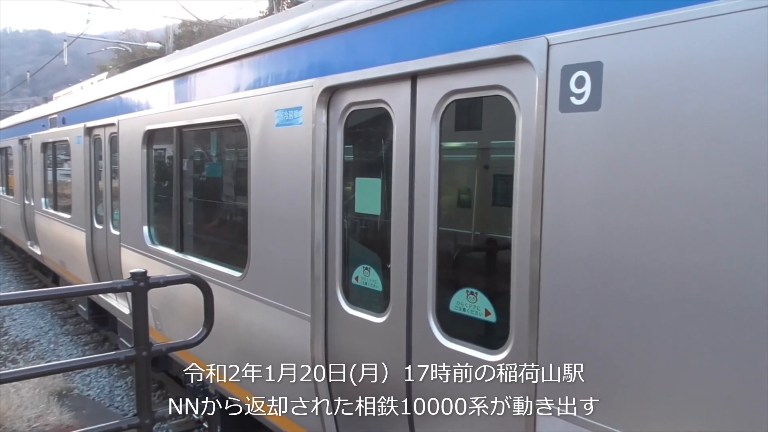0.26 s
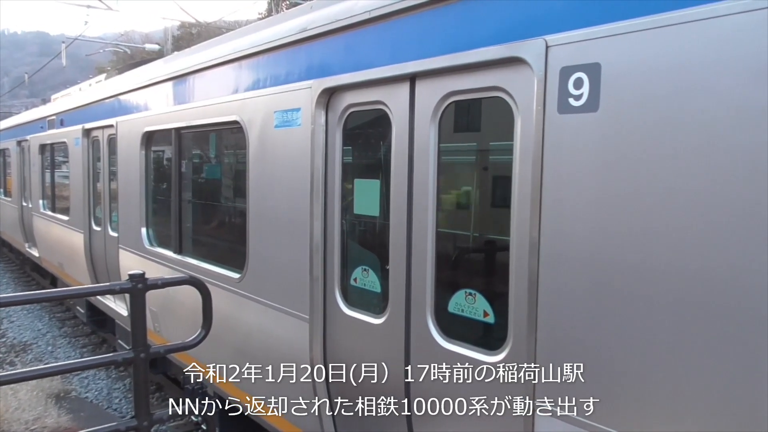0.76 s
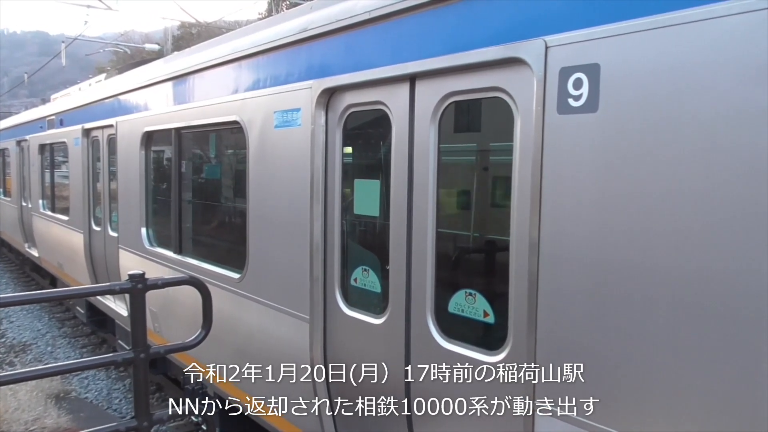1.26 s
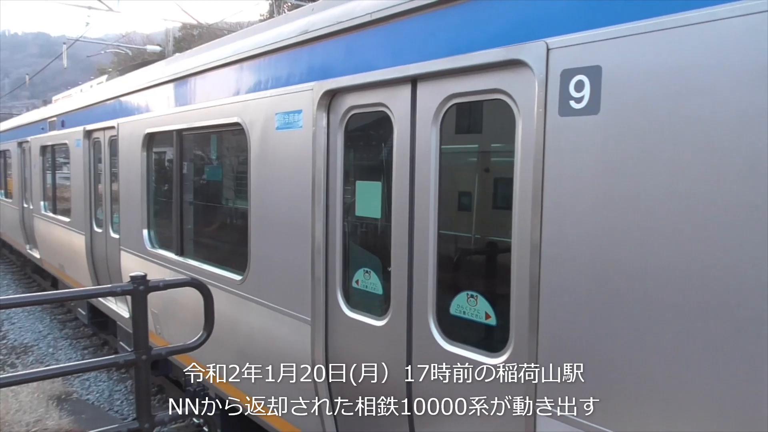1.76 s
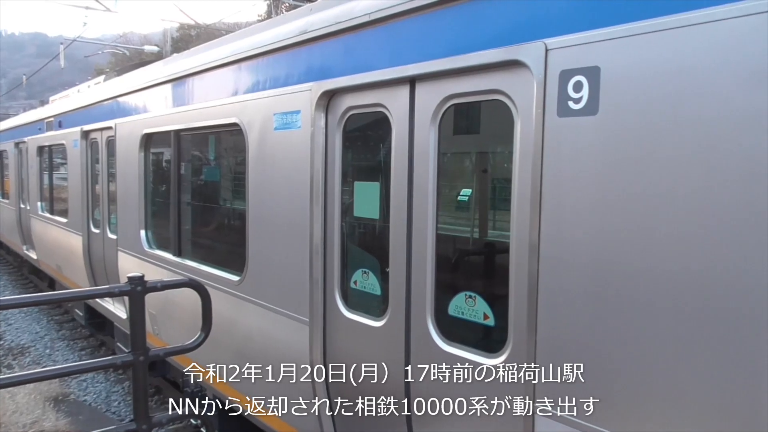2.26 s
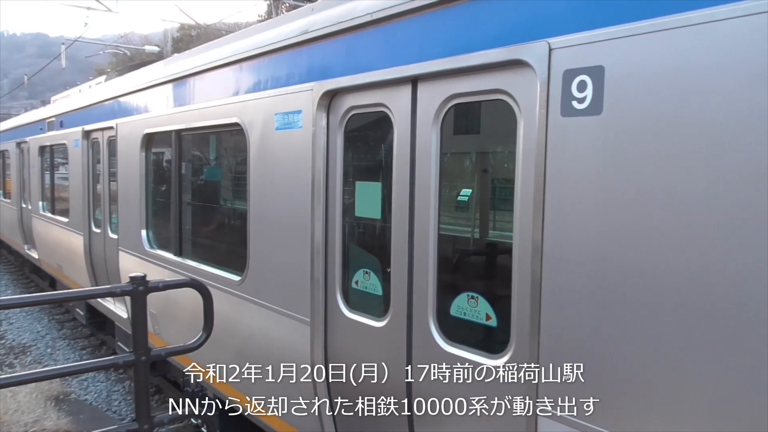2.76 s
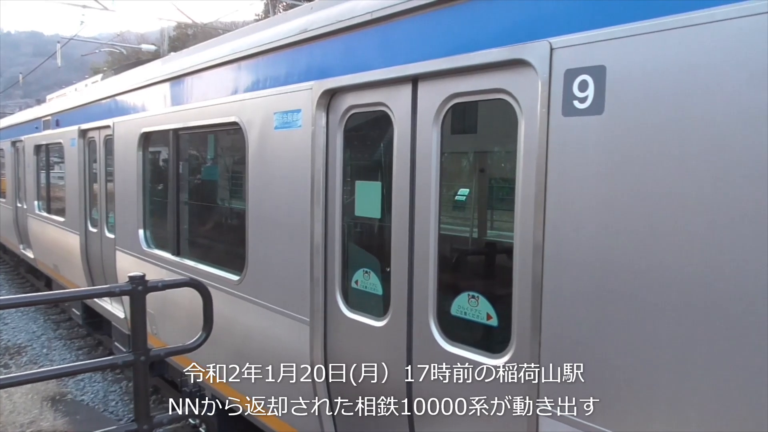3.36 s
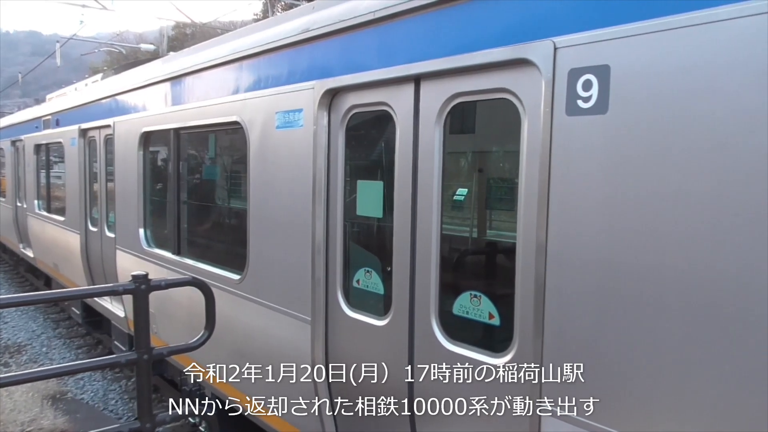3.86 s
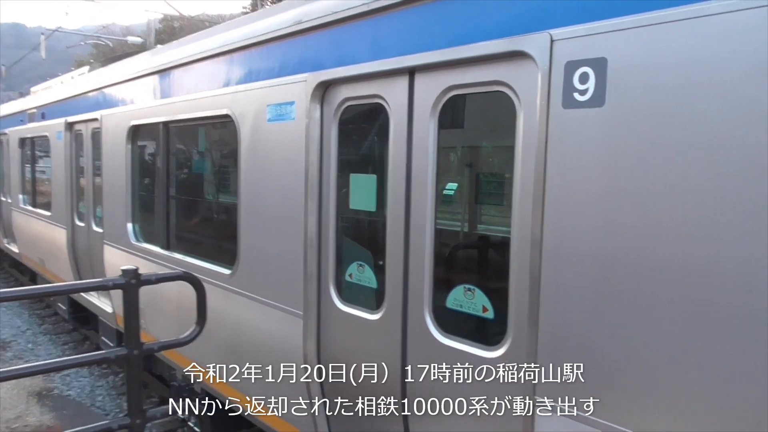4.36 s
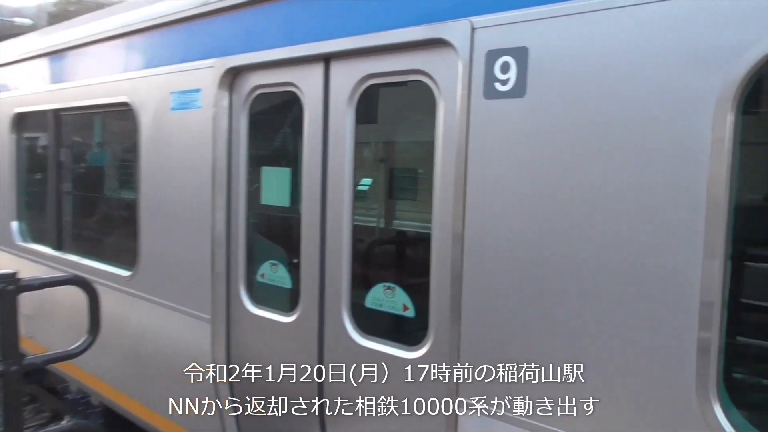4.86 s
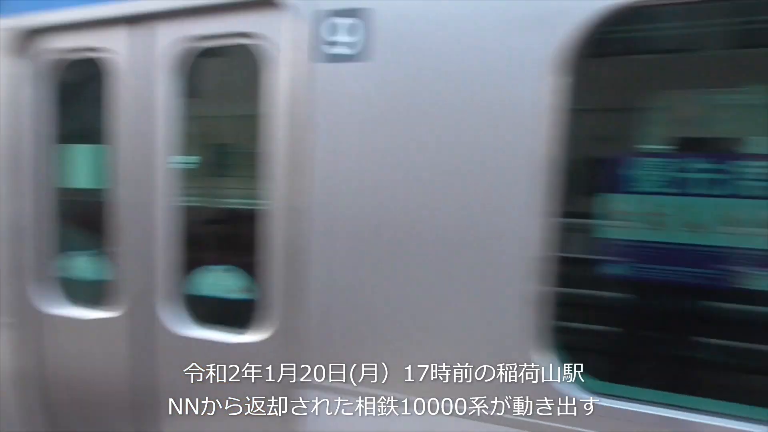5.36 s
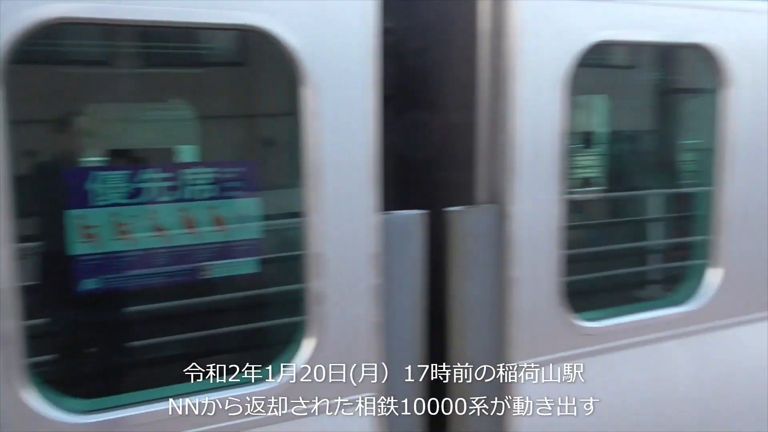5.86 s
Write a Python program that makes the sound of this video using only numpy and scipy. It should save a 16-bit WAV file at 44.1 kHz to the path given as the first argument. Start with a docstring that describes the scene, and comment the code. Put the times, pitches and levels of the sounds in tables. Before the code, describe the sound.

Already under way, a train beats over rail joints very close to a small stereo microphone pair in open air. Loud, bouncing clunks with short metal ring and loose rattle come about five a second, in clusters, with muffled thuds between. A deep rumble, hollow low humming of wheels and thin hiss ebb away. Later thuds are sparse and dull, with one brief steel grind and light flange scuffs.

```python
"""A low rumble and roar with a fine hiss: an electric train rolls out past the end of a platform,
an arm's length from a pair of close microphone ports.
Paired thumps follow: each two-axle bogie meets the same row of rail joints, softer and duller from further
down the line; the nearest joint is loose and rattles. Blows are decaying tones, rail modes and noise bursts.
Between them shaped noise makes the wheels rumble, sing and scuff; the hiss moves off with the train."""
import sys
import numpy as np
from scipy import signal
from scipy.fft import rfft, irfft, next_fast_len
from scipy.io import wavfile
from scipy.ndimage import uniform_filter1d

SR = 44100
rng = np.random.default_rng(int(sys.argv[2]) if len(sys.argv) > 2 else 0)


def int16_out(signal):
    """Quantize to a 16-bit WAV file."""
    q = np.round(np.clip(np.atleast_2d(signal).T, -1, 1) * 32767)
    wavfile.write(sys.argv[1], SR, q.astype(np.int16))


N = 269010
TIME = np.arange(N) / SR

# Levels over time are relative, before each layer's own trim.
# rolling, fading as the train leaves: time_s, near_wheel_rumble_db, rail_roar_db
ROLLING_LEVELS = [(0.0, -26.5, -37.5), (0.56, -26.5, -40), (0.95, -27.5, -36.5), (1.29, -29, -42),
                  (1.6, -28.5, -43), (1.95, -27, -41.5), (2.26, -28, -37), (2.65, -32, -42.5),
                  (2.95, -33.5, -46), (3.38, -32.5, -43.5), (3.87, -37.5, -47), (4.4, -38.5, -45),
                  (4.6, -37.5, -43), (4.85, -37, -45), (5.18, -40, -46), (5.83, -38, -44),
                  (6.1, -42, -45.5)]
# ground shuddering under the whole train: time_s, level_db
GROUND_LEVELS = [(0, -39), (1.2, -53), (1.7, -53), (2.3, -51), (3.2, -50), (3.8, -54), (4.7, -45),
                 (5.2, -57), (6.1, -56)]
# friction of the running gear: time_s, rim_ring_db, hiss_db
FRICTION_LEVELS = [(0.0, -45, -48), (0.3, -40.5, -48), (0.66, -50, -50.5), (0.97, -46, -50),
                   (1.65, -55, -53.5), (1.95, -60, -51), (2.26, -51, -50), (2.41, -51, -52),
                   (2.9, -53.5, -54), (3.48, -50, -55.5), (3.72, -54, -56), (3.97, -65, -55),
                   (4.15, -54, -54.5), (4.37, -52, -58.5), (4.7, -55, -57.5), (4.85, -58, -59.5),
                   (4.98, -57, -64.5), (5.3, -70, -65.5), (6.1, -58, -64)]
# low song of the wheels, fading as the train leaves: time_s, level_db
SONG_LEVELS = [(0.0, -33), (1.14, -27.5), (1.56, -39.5), (2.19, -31.5), (2.7, -42.5), (3.25, -37.5),
               (3.8, -43), (4.4, -44.5), (4.59, -37.5), (5.08, -56), (5.69, -55), (6.1, -60)]

# Noise colours, each scaled to unit power afterwards: frequency_hz, relative_density_db (per Hz)
RUMBLE_COLOUR = [(25, -37), (54, -18), (100, -6.5), (145, -4.5), (216, 0.5), (300, 0.5), (370, -2.5),
                 (448, -8.5), (532, -9), (620, -18), (800, -42), (1320, -70)]
GROUND_COLOUR = [(15, -20), (30, -18), (48, -9), (62, 2), (90, -5)]
ROAR_COLOUR = [(150, -9), (260, -8.5), (380, -2), (460, -4.5), (567, -1), (787, -5.5), (1010, -9),
               (1400, -17), (1850, -27), (3140, -34.5), (4050, -38), (5000, -38), (6500, -62),
               (11000, -120)]
HISS_COLOUR = [(1060, -35), (1800, -12), (2150, -2.5), (2600, -4.5), (2930, -9.5), (3120, -4.5),
               (3660, -3.5), (6280, -4.5), (11100, -2), (13000, -5), (14200, -11.5), (15400, -10)]
THUD_COLOUR = [(40, -29), (70, -24), (115, -15.5), (170, -3), (226, -2), (295, 1.5), (393, -5), (441, -9),
               (499, -11), (560, -12.5), (730, -27), (1230, -120)]
CLANK_COLOUR = [(260, -46), (450, -5.5), (497, 2), (563, -14.5), (679, -2), (765, -2), (994, -18.5),
                (1110, -15), (2000, -43.5), (2600, -42), (4400, -120)]
RATTLE_COLOUR = [(820, -50), (1400, -1), (1920, -9.5), (2150, -3), (2620, -12), (2860, -7.5), (3100, -8.5),
                 (6140, -12), (7790, -9.5), (9690, -11.5), (12400, -16.5), (15000, -35)]
GRIND_COLOUR = [(560, -4), (760, 3), (1000, -12), (1300, -15), (1500, -25)]

# wheel rim resonances: centre_hz, width_hz, relative_level_db
RIM_RESONANCES = [(2170, 79, -13), (2890, 100, -12), (3750, 200, -18), (4040, 830, -7.5)]
# wheel flanges scuffing the rail: middle_s, half_length_s, centre_hz, width_hz, level_db
FLANGE_SCUFFS = [(0.149, 0.047, 2000, 2400, -44), (0.179, 0.018, 1990, 2980, -36),
                 (2.451, 0.07, 2880, 130, -56), (2.709, 0.036, 2900, 110, -52.5),
                 (2.76, 0.071, 2194, 600, -58), (3.1, 0.37, 3880, 799.5, -64),
                 (3.459, 0.26, 2318, 220, -60), (4.07, 0.2, 4470, 2400, -55.5), (4.09, 0.2, 3500, 130, -64),
                 (4.705, 0.038, 2200, 1391, -54), (4.773, 0.24, 3599, 2000, -58),
                 (5.473, 0.015, 595.5, 200, -31)]
# axles crossing rail joints, the two of a bogie about 0.2 s apart; hard and high at the nearest joint,
# soft and low further off: strike_s, thump_db, pitch_hz, clank_db, first_hop_s, first_rebound_thump_db,
# rebound_pitch_hz, second_rebound_thump_db, clank_change_per_rebound_db
JOINT_CROSSINGS = [ (0.199, -2.5, 289.4, -18, 0.042, -9, 278.5, -18, -6.5),
                   (0.4, 0.5, 302.8, -18.5, 0.023, -10, 296, -19, -10),
                   (0.602, -11, 190, -31.5, 0.015, -10, 270.1, -17, 2),
                   (0.819, -2.5, 303, -18, 0.035, -2.5, 285, -20, -5.5),
                   (1.022, -5, 319, -17.5, 0.035, -5.5, 285, -8, -5),
                   (1.226, -15, 200, -33, 0.042, -13, 245, -21, -1),
                   (1.418, -13, 206, -35.5, 0.021, -13, 267, -29, 1.5),
                   (1.68, -13.5, 160, -29.5, 0.033, -15, 257, -18.5, -4),
                   (1.878, -12.5, 155.3, -33, 0.034, -16, 260.4, -16, -1.5),
                   (2.117, -3, 300.3, -18, 0.036, -4, 291.6, -15.5, -5.5),
                   (2.319, -2, 312, -17.5, 0.039, -8.5, 319, -9, -6),
                   (2.52, -9, 214.4, -39.5, 0.041, -14, 295.3, -15, 2.5),
                   (2.723, -12.5, 215, -32, 0.049, -12, 239.9, -28.5, -1),
                   (2.94, -24, 233.8, -34, 0.035, -28, 269, -22, -4),
                   (3.143, -11.5, 210, -31, 0.046, -13.5, 239.1, -24, -1),
                   (3.343, -11, 175, -33, 0.035, -13, 250.5, -14, -1.5),
                   (3.549, -22, 266, -37.5, 0.032, -28, 274, -29, -9.5),
                   (3.965, -24, 267, -40, 0.028, -23.5, 279.4, -33, -2),
                   (4.155, -20, 241, -41, 0.026, -20, 305.4, -33, -2.5),
                   (4.436, -10, 219.7, -37, 0.048, -16, 300.6, -16, 2),
                   (4.635, -7, 215, -35.5, 0.057, -14.5, 240, -15, -0.5),
                   (4.868, -31, 239, -41, 0.039, -31, 273, -31, -3),
                   (5.27, -26, 255, -38, 0.034, -28.5, 272, -39, 0),
                   (5.459, -19.5, 231, -37.5, 0.052, -25.5, 321, -30.5, -0.5),
                   (5.665, -24, 220, -37, 0.028, -25, 281, -35.5, -7),
                   (5.896, -24, 275, -35, 0.044, -27, 269.3, -35, -8),
                   (6.08, -17.5, 234, -41, 0.036, -24, 270, -33, -8)]
# rail and wheel modes woken by a hard blow: frequency_hz, relative_level_db, t60_s
BLOW_MODES = [(133, -19.5, 0.18), (194.4, -16, 0.26), (299.2, -14, 0.28), (384, -15, 0.33),
              (496.3, -21.5, 0.264), (663.5, -19.5, 0.24), (768, -24, 0.13), (884, -22, 0.11),
              (1075, -28, 0.2), (1233, -28, 0.1), (2160, -39, 0.2)]

# the microphone pair: frequency_hz, likeness (0 to 1)
PORT_LIKENESS = [(30, 0.95), (70, 0.79), (300, 0.96), (600, 0.87), (1200, 0.42), (2400, 0.31), (4500, 0.21),
                 (7000, .35), (9000, 0.53), (12000, 0.098), (15000, 0.13)]
# the microphone pair: frequency_hz, left_minus_right_db
PORT_TILT = [(35, 3), (80, 1.5), (170, 0), (330, -1), (600, -3.5), (1200, -2.5), (2800, -3), (6000, -1.1),
             (10000, 0), (15000, -5.5)]
# the microphone pair: frequency_hz, left_lead_rad (negative where the right leads)
PORT_LEAD = [(40, 0), (75, 1.06), (105, 0.5), (160, -0.55), (250, -0.4), (600, -0.94), (1100, 0),
             (2200, -.5), (4000, -1), (6400, -1.74), (9000, -2.5), (12000, -2.5), (15000, -10)]

RUMBLE_TRIM_DB, ROAR_TRIM_DB, RIMS_TRIM_DB, HISS_TRIM_DB = 1.5, 6.5, -3, 4.5
RUMBLE_WANDER = 0.04   # share by which the rumble's colour shifts along the track
# the car body booms along with the rumble
BOOM_HZ, BOOM_WIDTH_HZ, BOOM_DB, BOOM_FOLLOWS = 73.55, 9, -43.5, 1
SONG_HZ, SONG_WIDTH_HZ, SONG_TRIM_DB = 370, 28.7, 2.1
HARD_CLANK_DB = -21.5   # a clank above this counts as a hard blow
SOFT_RANGE_DB = 11.5   # a clank this far below a hard blow is fully soft
# just before the strike the wheel drops off the near rail end, plainly only before a hard blow
DROP_LEAD_S, DROP_THUMP_DB, DROP_CLANK_DB = 0.01488, -9.5, -11
DROP_FOLLOWS = 0.3806   # dB of drop per dB of hardness
# after striking the far rail end the wheel rebounds twice, the second hop shorter and its blow higher
HOP_SHRINK, HOP_PITCH_RISE = 0.57, 1.16
# rise and decay at the hard-blow threshold; dB of lengthening per dB a blow is softer
RISE_S, SOFT_SWELLS = 0.002995, 0.28
THUMP_T60_S, SOFT_LINGERS = 0.13, 0.12
PITCH_SCATTER = 0.015   # standard deviation as a share of the pitch
CHATTER_HZ, CHATTER_DEPTH = 71.3, 0.4   # the wheel judders on the springy track, so each thump throbs
# added to a fully soft blow
SOFT_GLIDE_HZ_PER_S, SOFT_CHATTER, SOFT_CLANK_LAG_S = 650, 0.12, 0.0035
# the thud has its listed colour at this pitch and slides partly with each blow
THUD_PITCH_HZ, THUD_FOLLOWS = 259.7, 0.45
# steel on steel: the short knock at the front of a hard blow
KNOCK_HZ, KNOCK_WIDTH_HZ, KNOCK_DB, KNOCK_T60_S = 1100, 460, -29.5, 0.11
RATTLE_LEAD_S = 0.005
GRIND_S, GRIND_HOLD_S, GRIND_T60_S, GRIND_DB = 4.599, 0.046, 0.42, -31
PORT_HZ, PORT_WIDTH_HZ, PORT_DB = 8750, 1560, 2
CUTOFF_HZ = 15300


def from_db(db):
    """Decibels to gain."""
    return 10 ** (np.asarray(db) / 20)


def rms_one(x):
    """Scale to unit power."""
    return x / np.sqrt(np.mean(x ** 2) + 1e-20)


def in_time(rows):
    """Each column of a curve at every sample."""
    seconds, *columns = np.transpose(rows)
    return [np.interp(TIME, seconds, column) for column in columns]


def at_hz(points, hz):
    """Read a table on a log-frequency axis."""
    table_hz, values = np.array(points).T
    return np.interp(np.log(hz + 1e-9), np.log(table_hz), values)


def add(out, start_s, sound):
    """Mix a sound in from a start time on."""
    at = max(round(start_s * SR), 0)
    out[..., at:at + sound.shape[-1]] += sound[..., :max(N - at, 0)]


def drift(rate):
    """Slow chance with spread 1: low-passed noise, drawn every 40 samples."""
    pole = np.exp(-80 * np.pi * rate / SR)
    draws = rng.standard_normal(N // 40 + 2002)
    slow = signal.lfilter([1], [1, -2 * pole, pole * pole], draws)[2000:]   # past the filter's start
    return np.interp(np.arange(N) / 40, np.arange(len(slow)), rms_one(slow))


def noise(spectrum, size=N):
    """Two unrelated noises (direct and scattered sound) of one colour, falling steeply past its ends."""
    n = next_fast_len(size)
    hz = np.arange(1, n // 2 + 2) * SR / n
    skirts = 1 / (1 + (spectrum[0][0] / hz) ** 8) / (1 + (hz / spectrum[-1][0]) ** 8)
    white = rfft(rng.standard_normal((2, n)))
    return rms_one(irfft(white * from_db(at_hz(spectrum, hz)) * skirts, n)[:, :size])


def resonant_noise(hz, width_hz, size=N):
    """Direct and scattered noise through one resonance."""
    low = np.hypot(hz, width_hz / 2) - width_hz / 2
    high = min(low + width_hz, .45 * SR)
    band = signal.butter(2, [low, high], "band", fs=SR, output="sos")
    white = rng.standard_normal((2, size + SR // 4))
    return rms_one(signal.sosfilt(band, white)[:, -size:])


def evened(x, span_s):
    """Keep the fine grain of a noise but hold its power steady over the span."""
    power = uniform_filter1d(x ** 2, max(int(span_s * SR), 1))
    return x / np.sqrt(np.abs(power) + 1e-12)


def bent(x, ratio):
    """Slide the whole colour of a noise up or down by a changing pitch ratio."""
    return np.array([np.interp(np.cumsum(ratio), np.arange(len(row)), row) for row in x])


def struck(t, rise_s, t60):
    """Envelope of a blow: a quick rise and a steady decay."""
    return (1 - np.exp(-t / max(rise_s, 1e-5))) * from_db(-60 * t / t60)


def rumble_and_roar():
    """Rough treads shake wheels and rails, so rumble and roar undulate together."""
    rumble_db, roar_db = in_time(ROLLING_LEVELS)
    tread = drift(7.3)
    track_colour = bent(noise(RUMBLE_COLOUR, size=2 * N), 1 + RUMBLE_WANDER * drift(6))
    rumble = from_db(rumble_db + RUMBLE_TRIM_DB + 1.46 * tread) * evened(track_colour, span_s=0.06)
    roar_gain = from_db(roar_db + ROAR_TRIM_DB + 0.81 * tread + 0.75 * drift(24))
    return rumble + roar_gain * noise(ROAR_COLOUR)


def ground():
    """The ground shudders under the whole train: slowly wavering low noise."""
    level_db, = in_time(GROUND_LEVELS)
    return from_db(level_db + 1.1 * drift(5)) * noise(GROUND_COLOUR)


def friction():
    """Friction of the running gear hisses and rings the rims, each mode waxing and waning by itself."""
    rims_db, hiss_db = in_time(FRICTION_LEVELS)
    hiss = from_db(hiss_db + HISS_TRIM_DB + 0.26 * drift(5.4)) * noise(HISS_COLOUR)
    rims = sum(from_db(db + 2.0 * drift(7.6)) * resonant_noise(hz, width_hz)
               for hz, width_hz, db in RIM_RESONANCES)
    return hiss + from_db(rims_db + RIMS_TRIM_DB) * rims


def boom():
    """The rumble keeps the car body booming in one low resonance."""
    rumble_db = in_time(ROLLING_LEVELS)[0]
    gain = from_db(BOOM_DB + BOOM_FOLLOWS * (rumble_db - rumble_db.mean()))
    return gain * evened(resonant_noise(BOOM_HZ, BOOM_WIDTH_HZ), span_s=0.14)


def song():
    """The wheels sing low: noise narrowed by one resonance."""
    level_db, = in_time(SONG_LEVELS)
    return from_db(level_db + SONG_TRIM_DB) * evened(resonant_noise(SONG_HZ, SONG_WIDTH_HZ), span_s=0.076)


def scuffs():
    """A flange brushes the rail: a short swell of friction noise in one resonance."""
    out = np.zeros((2, N))
    for middle_s, half_length_s, hz, width_hz, level_db in FLANGE_SCUFFS:
        size = int(2 * half_length_s * SR)
        grain = evened(resonant_noise(hz, width_hz, size), span_s=0.035)
        add(out, middle_s - half_length_s, from_db(level_db) * np.hanning(size) * grain)
    return out


def contacts():
    """A crossing is a drop, a strike and two rebounds: start_s, thump_db, pitch_hz, clank_db."""
    rows = []
    for s, thump_db, hz, clank_db, hop_s, first_db, rebound_hz, second_db, clank_step_db in JOINT_CROSSINGS:
        drop_db = thump_db + DROP_THUMP_DB + DROP_FOLLOWS * (clank_db - HARD_CLANK_DB)
        second_s = s + hop_s * (1 + HOP_SHRINK)
        rows += [(s - DROP_LEAD_S, drop_db, hz, clank_db + DROP_CLANK_DB),
                 (s, thump_db, hz, clank_db),
                 (s + hop_s, first_db, rebound_hz, clank_db + clank_step_db),
                 (second_s, second_db, rebound_hz * HOP_PITCH_RISE, clank_db + 2 * clank_step_db)]
    return rows


def joints(size=22050):
    """Each contact bounces the wheel on the track; a hard one also knocks, rings the rail and rattles the joint."""
    t = np.arange(size) / SR
    tones = np.zeros(N)
    power = np.full((5, N), 1e-14)   # thud, pitch-weighted thud, clank, knock, rattle
    modes = np.array([(-1) ** k * from_db(db - 60 * t / t60) * np.sin(2 * np.pi * hz * t)
                      for k, (hz, db, t60) in enumerate(BLOW_MODES)])
    for s, thump_db, hz, clank_db in contacts():
        hardness_db = clank_db - HARD_CLANK_DB
        # soft blows from joints further off swell more slowly, judder more and slide up in pitch
        softness = np.clip(-hardness_db / SOFT_RANGE_DB, 0, 1)
        rise_s = RISE_S * from_db(-SOFT_SWELLS * hardness_db)
        thump_t60_s = THUMP_T60_S * from_db(-SOFT_LINGERS * hardness_db)
        judder = 1 + (CHATTER_DEPTH + SOFT_CHATTER * softness) * np.sin(2 * np.pi * CHATTER_HZ * t)
        pitch_hz = hz * (1 + PITCH_SCATTER * rng.standard_normal()) + SOFT_GLIDE_HZ_PER_S * softness * t
        bounce = judder * np.sin(2 * np.pi * np.cumsum(pitch_hz) / SR)
        thump = from_db(thump_db - 2.0) * struck(t, rise_s, thump_t60_s) * bounce
        mode_gains = from_db(hardness_db - 10.0 + rng.normal(0, 0.77, len(modes)))
        ring = (1 - np.exp(-t / rise_s)) * (mode_gains @ modes)
        add(tones, s, thump + ring)
        # sleepers, bogie and car body answer with a thicket of low modes
        thud = from_db(thump_db - 10.5) * struck(t, rise_s, t60=0.24)
        pitch_ratio = (hz / THUD_PITCH_HZ) ** THUD_FOLLOWS
        clank = from_db(clank_db) * struck(t, rise_s + SOFT_CLANK_LAG_S * softness, t60=0.21)
        knock = from_db(KNOCK_DB + hardness_db) * (1 - softness) * struck(t, rise_s, KNOCK_T60_S)
        add(power, s, np.array([thud ** 2, thud ** 2 * pitch_ratio, clank ** 2, knock ** 2, 0 * t]))
        # the rattle starts as the wheel loads the joint, builds slowly and grows much faster than the force
        rattle = from_db(-33.0 + 1.7 * hardness_db) * struck(t, rise_s=0.022, t60=0.29)
        add(power[4], s - RATTLE_LEAD_S, rattle ** 2)
    thud, _, clank, knock, rattle = np.sqrt(power)
    thud_slide = power[1] / power[0]   # pitch ratio of the contacts, weighted by their power
    out = thud * evened(bent(noise(THUD_COLOUR, size=2 * N), thud_slide), span_s=0.0083)
    out += clank * evened(noise(CLANK_COLOUR), span_s=0.0065)
    out += knock * resonant_noise(KNOCK_HZ, KNOCK_WIDTH_HZ)
    out += rattle * noise(RATTLE_COLOUR)
    out[0] += tones   # direct sound only
    return out


def grind():
    """A flange bites into the rail just before a blow: it grinds at once, holds and lets go."""
    t = np.maximum(TIME - GRIND_S, 0)
    decay_db = -60 * np.maximum(t - GRIND_HOLD_S, 0) / GRIND_T60_S
    envelope = (1 - np.exp(-t / 0.003)) * from_db(GRIND_DB + decay_db)
    return envelope * evened(noise(GRIND_COLOUR), span_s=0.00799)


def microphones(sound):
    """Two close ports: alike in the bass, scattered in the treble, the right leading over most of the band."""
    n = next_fast_len(N + SR // 4)
    hz = np.arange(n // 2 + 1) * SR / n
    # the small cavity behind each port lifts one treble band
    cavity = from_db(PORT_DB * np.exp(-((hz - PORT_HZ) / PORT_WIDTH_HZ) ** 2))
    direct, scattered = rfft(sound, n) * cavity
    alike = np.clip(at_hz(PORT_LIKENESS, hz), 0, 1)
    sides = np.array([[1], [-1]])   # left, right
    pair = np.sqrt((1 + alike) / 2) * direct + sides * np.sqrt((1 - alike) / 2) * scattered
    tilt = from_db(sides * at_hz(PORT_TILT, hz) / 2)
    lead = np.exp(.5j * sides * at_hz(PORT_LEAD, hz))
    return irfft(pair * tilt * lead, n)[:, :N]


def scene():
    """Rolling, singing, scuffs, joints and one grind, heard from the platform end."""
    rolling = rumble_and_roar() + ground() + friction()
    singing = boom() + song()
    return microphones(rolling + singing + scuffs() + joints() + grind())


def record(dry):
    """The highest peaks are rounded and the top is cut."""
    rounded = dry / (1 + (dry / .97) ** 6) ** (1 / 6)
    top_cut = signal.ellip(10, .1, 90, CUTOFF_HZ, fs=SR, output="sos")
    return signal.sosfilt(top_cut, rounded)


dry = scene()
out = record(dry)
int16_out(out)
```